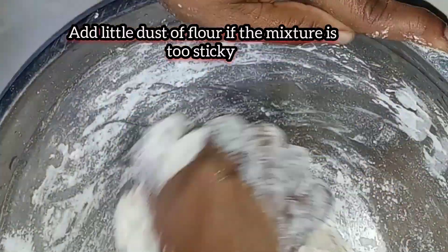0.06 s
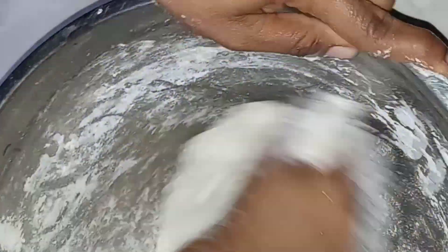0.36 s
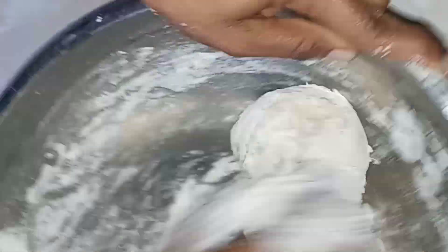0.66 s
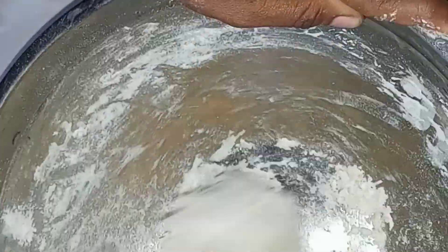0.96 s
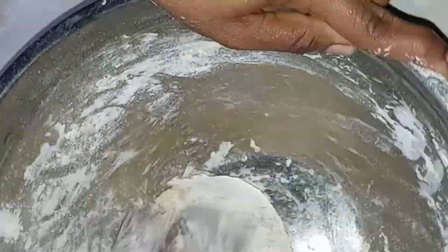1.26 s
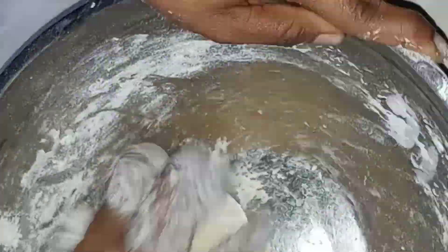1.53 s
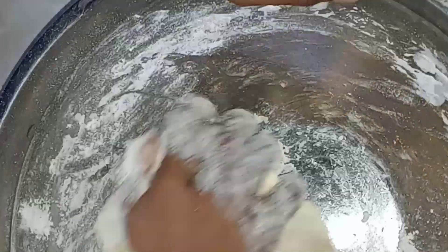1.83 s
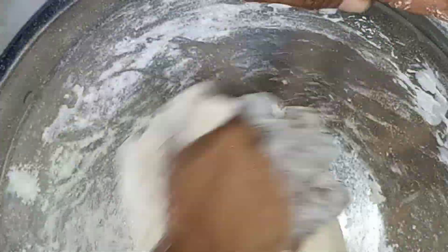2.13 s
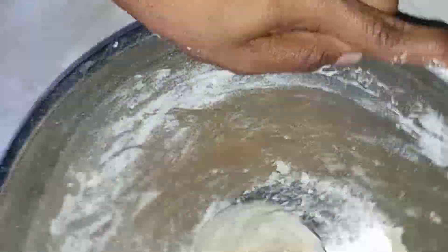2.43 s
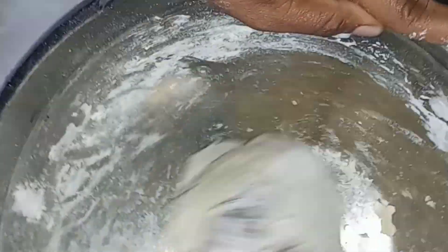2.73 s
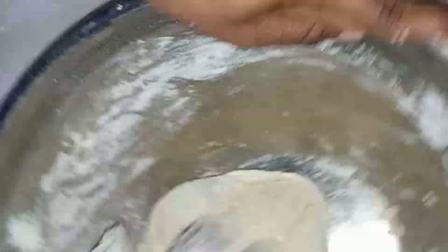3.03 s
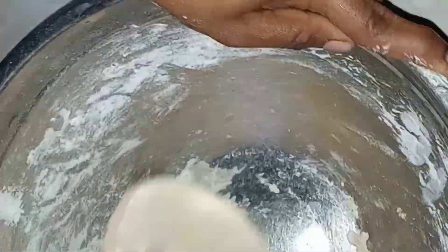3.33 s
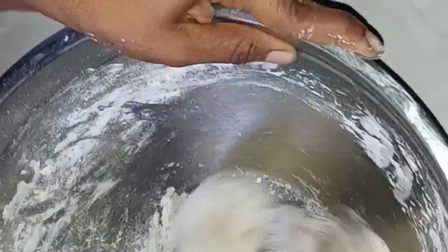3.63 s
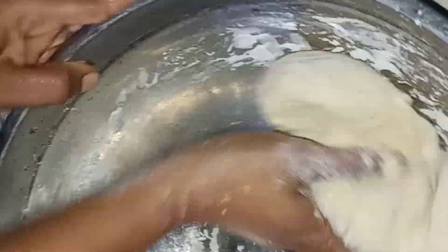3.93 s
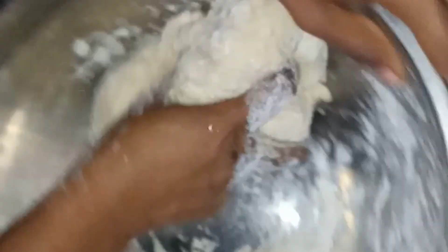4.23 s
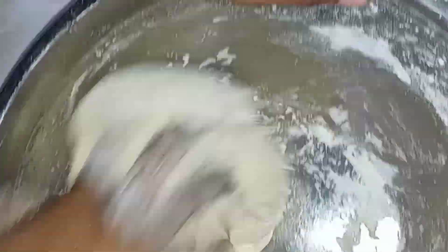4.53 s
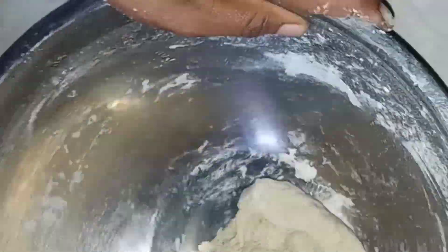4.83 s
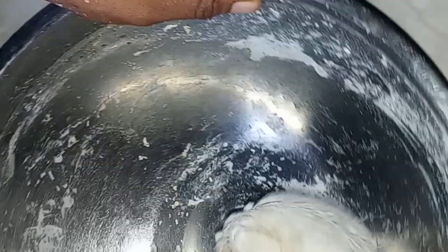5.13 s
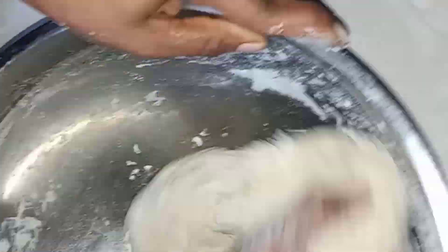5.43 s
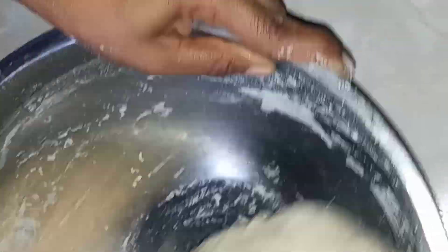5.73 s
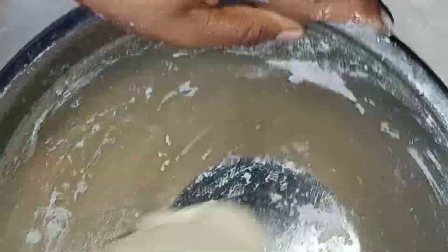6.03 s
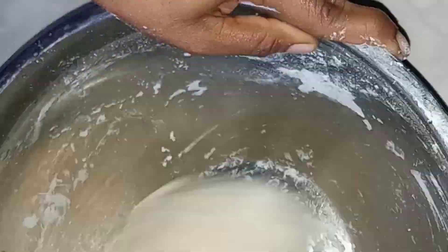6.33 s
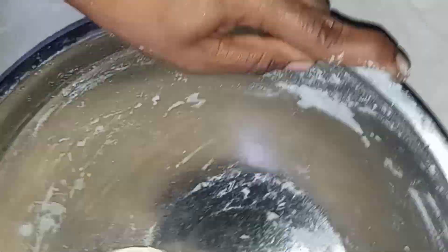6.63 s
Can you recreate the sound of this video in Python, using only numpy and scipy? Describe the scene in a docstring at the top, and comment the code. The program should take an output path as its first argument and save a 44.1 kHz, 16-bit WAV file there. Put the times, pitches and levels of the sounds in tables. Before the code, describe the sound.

Short, gritty swishes and soft, hollow thuds alternate as dough is pushed and turned by hand in a metal bowl. Tiny pops and a few faint skin squeaks slip in between. Around four seconds in comes a quick run of harder, moist smacks, followed by lighter slaps and more rubbing. The steel sounds damped, and the microphone is close, with a faint low kitchen background.

```python
"""A quiet kitchen, close up on a hand kneading soft dough in a floured steel bowl.
The dough lands in soft slaps, each with a hollow note of trapped air, and between them it is
wiped round the wall with a gritty hiss. Bubbles pop out of the folds and skin squeaks faintly.
The other hand grips the rim, so the steel hardly rings."""
import sys
import numpy as np
from scipy import signal
from scipy.fft import rfft, irfft
from scipy.io import wavfile
from scipy.ndimage import uniform_filter1d

SR = 44100
rng = np.random.default_rng(int(sys.argv[2]) if len(sys.argv) > 2 else 0)


def put_to_file(sound):
    """Save the sound as 16-bit audio at rate SR, in the file named by the first command-line argument."""
    columns = np.atleast_2d(sound).T  # one column per channel
    safe = np.clip(columns, -1, 1)
    whole_steps = np.round(safe * 32767)
    wavfile.write(sys.argv[1], SR, whole_steps.astype(np.int16))


N = 293706

# EQ of the kitchen's still air: freq_hz, gain_db
ROOM_EQ = [(15, -45), (25, -13.5), (82, 12), (166, 8.5), (242, -1), (516, 5), (754, -8), (863, -10),
           (1190, -9), (3430, -15), (5570, -32), (8360, -39.5), (13600, -33.5), (14800, -27.5),
           (16000, -20.5)]
# stereo width, side against mid: freq_hz, gain_db
SIDE_EQ = [(60, -15), (300, -12), (550, -8), (1300, -1.5), (2500, -0.5), (15000, 0.5)]
# balance, left against right: freq_hz, gain_db
BALANCE_EQ = [(100, -1.5), (600, 0.28), (1400, -0.095), (3000, -0.55), (10000, -2.3)]
# bowl modes damped by hand and dough: pitch_hz, width_hz, boost_db
DAMPED_MODES = [(166.7, 38.5, 10), (286.6, 31, 5.5), (361, 43, 14.5), (526.3, 52, 11), (868, 29, 6.5),
                (924, 63, 1), (1520, 58, 2), (1770.5, 29, 5), (1970, 12, 3), (2490, 38, 2),
                (4930, 120, 4.5), (5520, 144, 3)]
# modes of the free wall that ring on: pitch_hz, level_db, t60_s
RINGING_MODES = [(904, -29, 0.16), (1733, -23, 0.17), (2025, -25.5, 0.4), (4725, -21, 0.08),
                 (5500, -25, 0.044), (5900, -31, .08)]
# EQ of the rumble from the hand on the rim: freq_hz, gain_db
GRIP_EQ = [(50, 0.5), (110, -4.0), (250, -13.5), (550, -25.0), (900, -8.0)]
# EQs of a wipe's layers, rubbing hiss, flour fizz and low drag: freq_hz, gain_db
HISS_EQ = [(2800, -22.5), (3800, -5), (4700, -4), (5500, -1.5), (6000, -1), (6800, -2.5), (7600, -6.5),
           (9500, -40)]
FIZZ_EQ = [(5500, -22.5), (7500, 1.5), (9000, 2.5), (11000, 2), (13500, -2.5), (14500, 5), (15400, 9),
           (16200, -25)]
DRAG_EQ = [(25, -6), (70, 13.5), (130, -3), (280, -8.5), (520, 3), (900, 1), (1300, -1.5), (2200, -3),
           (3000, -0.5), (5000, -9.5), (7000, -57)]
# EQs of a slap's layers, thud, hollow air, smack and wet crack: freq_hz, gain_db
THUD_EQ = [(20, -50.5), (45, -16), (80, 1), (130, -0.5), (190, -1.5), (280, -8.5), (450, -32.5)]
HOLLOW_EQ = [(170, -22.5), (280, -4.5), (600, -0.5), (900, -18.0)]
SMACK_EQ = [(400, -28.5), (620, -4), (780, 2), (1080, -0.5), (1350, -14.5), (1900, -34)]
CRACK_EQ = [(700, -21), (1300, 7.5), (2000, 2), (3200, 0), (4200, -5), (5600, -1.5), (8000, -17.5),
            (13000, -27.5), (15500, -21.5)]

# skin squeaking on steel: start_s, level_db, pitch_hz, length_s
SQUEAKS = [(0.345, -66, 2756, 0.078), (0.444, -72.5, 3760, 0.069), (0.721, -69, 3660, 0.05),
           (2.425, -63, 2680, 0.062), (2.671, -68, 2920, 0.066), (3.267, -70.5, 4000, .05),
           (3.338, -64.5, 3840, 0.066), (3.516, -74.5, 3050, 0.065)]
# bubbles squeezed out of folds: start_s, level_db, pitch_hz
BUBBLES = [(0.819, -54.5, 490), (1.0534, -53, 630), (1.592, -57, 493), (1.705, -62, 525),
           (2.8318, -61.5, 547), (3.8184, -54, 503), (5.345, -64.5, 637), (5.4025, -63.5, 670),
           (5.7405, -54, 740), (6.2966, -61.5, 375)]
# pushes into dough already lying on the steel: start_s, level_db
PUSHES = [(0.471, -63.5), (0.7607, -50), (1.229, -54.5), (3.715, -64), (4.207, -46.5), (5.472, -56.5),
          (5.79, -56), (6.362, -61), (6.405, -52)]
# wipes along the wall: peak_s, rise_s, fall_s, level_db, pitch_hz
WALL_WIPES = [(0.105, 0.021, 0.011, -59.5, 5690), (0.273, .006, .08, -65, 5950),
              (0.373, .025, 0.039, -61, 5070), (0.483, 0.0073, .004, -57.5, 5530),
              (0.526, .007, .015, -62, 5900), (0.652, 0.026, .008, -49.5, 6100),
              (0.672, .007, 0.014, -50, 5300), (0.832, 0.052, .014, -48.5, 5510),
              (0.923, .05, 0.0052, -60, 5230), (1.087, .02, 0.0065, -63, 5780),
              (1.17, 0.024, 0.0093, -45.5, 5930), (1.291, 0.0035, 0.026, -49.5, 5450),
              (1.387, 0.012, 0.014, -50.5, 5900), (1.44, 0.046, 0.011, -64.5, 5400),
              (1.548, 0.0061, 0.015, -42.5, 5300), (1.619, 0.021, .02, -47.5, 5000),
              (1.683, 0.027, .023, -51.5, 4930), (1.776, 0.0027, 0.016, -52.5, 5200),
              (1.832, 0.013, 0.038, -51.5, 5830), (2.086, 0.02, 0.008, -61, 5450),
              (2.181, 0.016, 0.0056, -54.5, 5150), (2.247, 0.0045, .013, -55.5, 4840),
              (2.366, 0.01, 0.029, -43, 5100), (2.474, 0.038, .014, -54.5, 5000),
              (2.565, 0.002, 0.039, -52.5, 5100), (2.671, .016, 0.011, -53, 6500),
              (2.717, 0.026, 0.0033, -59, 5300), (2.853, 0.0066, .04, -68, 6100),
              (2.922, 0.0047, .0045, -54, 6120), (3.04, 0.065, 0.01, -63, 5200),
              (3.204, 0.026, .025, -60, 5260), (3.317, 0.016, 0.0088, -58, 4900),
              (3.488, 0.046, .012, -45.5, 6350), (3.637, 0.012, 0.038, -49.5, 5720),
              (3.737, 0.024, 0.0023, -48, 5280), (3.817, .018, .09, -48.5, 5300),
              (3.903, 0.021, .007, -44, 6100), (4.003, 0.018, .013, -36.5, 6100),
              (4.107, 0.014, 0.0092, -38, 6150), (4.219, 0.039, 0.058, -49.5, 5270),
              (4.451, .011, .024, -38, 6150), (4.478, .09, .015, -54, 5300), (4.643, .011, .06, -59, 5220),
              (4.772, 0.047, .019, -44.5, 5900), (4.943, 0.012, 0.0059, -52, 5450),
              (5.013, .016, 0.017, -47, 5340), (5.11, 0.015, .0055, -47, 6130),
              (5.171, 0.012, .012, -49, 5970), (5.24, .012, 0.042, -66, 5550),
              (5.36, 0.015, 0.015, -53.5, 5300), (5.43, .006, 0.032, -64.5, 5750),
              (5.544, 0.0073, 0.0093, -43, 5520), (5.674, .036, 0.063, -57.5, 5920),
              (5.865, 0.0077, 0.025, -43.5, 5480), (6.054, 0.0058, .03, -59.5, 5300),
              (6.118, .005, .038, -62, 5400), (6.256, 0.023, .018, -62.5, 4900),
              (6.308, 0.012, 0.0051, -56.5, 5750), (6.385, 0.0065, 0.0032, -51.5, 5430),
              (6.447, .01, 0.0068, -51.5, 6600), (6.498, 0.027, 0.039, -52, 5100)]
# dough landing on the steel: start_s, contact_s, level_db, pocket_hz, smack_offset_db, crack_offset_db
LANDINGS = [(0.5235, 0.00453, -50, 502, -25, -43), (0.6672, .014, -45, 287, -12.5, -21),
            (1.2781, .011, -58.5, 680, -0.5, -20), (1.5444, 0.00457, -42.5, 550, -37, -29),
            (2.0618, 0.011, -53.5, 540, -24, -27), (2.3074, 0.0034, -41.5, 573, -2, -1),
            (2.352, .019, -55.5, 520, -7, -20), (3.017, .0117, -52.5, 285, -12.5, -30),
            (3.2625, .0049, -34, 307, -10.5, -25.5), (3.9587, 0.0042, -33.5, 404, 1, -10.5),
            (4.0212, 0.011, -48, 720, -0.5, -10), (4.0864, .013, -45.5, 633, -10.5, -31.5),
            (4.1596, 0.0074, -36, 459, -5.5, -24), (4.2345, 0.0096, -55.5, 660, 0.5, -8),
            (4.3633, 0.013, -31, 451, -2.5, -2.5), (4.9965, 0.011, -59.5, 347, -16, -2),
            (5.175, .014, -49.5, 450, -18, -24), (5.5246, .0094, -41.5, 369, -19, -27),
            (5.8528, 0.012, -51, 374, -5, -28), (6.108, 0.013, -56, 483, -7, -20)]


def amp(db):
    """Decibels to gain."""
    return 10 ** (np.asarray(db) / 20)


def unit(x):
    """Scales to rms 1."""
    return x / np.sqrt(np.mean(x ** 2) + 1e-20)


def wobble(size, smooth_steps):
    """A smoothed random control signal of rms 1."""
    return unit(uniform_filter1d(rng.standard_normal(size), int(smooth_steps)))


def curve(points, hz):
    """An EQ table's gain in dB, read on a log-frequency axis."""
    freq_hz, gain_db = np.transpose(points)
    return np.interp(np.log(hz + 1), np.log(freq_hz + 1), gain_db)


def band(points, hz):
    """An EQ curve that rolls off 20 dB an octave beyond its table."""
    octaves_out = abs(np.log2((hz + 1) / np.clip(hz + 1, points[0][0], points[-1][0])))
    return np.maximum(curve(points, hz) - 20 * octaves_out, -90)


def eq(x, gain_db, size=4096):
    """Minimum-phase EQ that follows the function gain_db(hz)."""
    cepstrum = irfft(np.log(amp(gain_db(np.fft.rfftfreq(size, 1 / SR)))), size)
    cepstrum[1:size // 2] *= 2
    cepstrum[size // 2 + 1:] = 0
    taps = irfft(np.exp(rfft(cepstrum)), size)
    return signal.oaconvolve(x, taps[None], axes=1)[:, :x.shape[1]]


def swept_resonance(x, pitch_hz, width_hz):
    """A band-pass whose centre rides the curve pitch_hz."""
    carrier = np.exp(2j * np.pi * np.cumsum(pitch_hz) / SR)
    pole = np.exp(-np.pi * width_hz / SR)
    return (carrier * signal.lfilter([1 - pole], [1, -pole], x / carrier)).real


def add(mix, start_s, sound):
    """Drops a two-channel sound into the mix."""
    part = mix[:, max(round(start_s * SR), 0):][:, :sound.shape[1]]
    part += sound[:, :part.shape[1]]


def reflections(length_s, t60_s, predelay_s):
    """A reverb impulse of decaying noise, with unit energy in each channel."""
    t = np.arange(int(length_s * SR)) / SR
    tail = rng.standard_normal((2, len(t))) * amp(-60 * t / t60_s) * (t > predelay_s)
    return tail / np.linalg.norm(tail, axis=1, keepdims=True)


def room_tone(level_db=-72.5):
    """The bed: the still air of the kitchen."""
    return amp(level_db) * unit(eq(rng.standard_normal((2, N)), lambda hz: curve(ROOM_EQ, hz)))


def kitchen_reverb(x, wet_db=-25):
    """The walls return a weak, short tail, fed from the mid channel."""
    tail = reflections(length_s=0.5, t60_s=0.17, predelay_s=0.008)
    return x + amp(wet_db) * signal.fftconvolve(x[:1], tail, axes=1)[:, :N]


def bowl_db(hz):
    """The boost that the steel's damped resonances give."""
    return sum(db / (1 + (2 * (hz - pitch) / width) ** 2) for pitch, width, db in DAMPED_MODES)


def bowl_echoes(x, wet_db=-6, low_cut_hz=350):
    """Short waves bounce between the steel walls for a few hundredths of a second."""
    echoes = reflections(length_s=0.1, t60_s=0.052, predelay_s=0.00264)
    echoes = signal.sosfilt(signal.butter(2, low_cut_hz, "high", fs=SR, output="sos"), echoes)
    return x + amp(wet_db) * signal.fftconvolve(x, echoes, axes=1)[:, :N]


def bowl_ring(x):
    """Rubbing keeps the free wall of the bowl faintly ringing."""
    t = np.arange(SR // 2) / SR
    ring = np.zeros(len(t))
    for pitch_hz, level_db, t60_s in RINGING_MODES:
        unit_energy = np.sqrt(4 * np.log(1000) / t60_s / SR)
        ring += unit_energy * amp(level_db - 60 * t / t60_s) * np.cos(2 * np.pi * pitch_hz * t)
    return x + signal.fftconvolve(x, ring[None], axes=1)[:, :N]


def rim_grip(level_db=-78, uneven_db=5, shift_s=0.021):
    """The hand on the rim shifts its hold: a faint, lumpy rumble through the bowl."""
    lumps = unit(uniform_filter1d(wobble(N, shift_s * SR), size=900))
    rumble = eq(rng.standard_normal((2, N)), lambda hz: band(GRIP_EQ, hz) + bowl_db(hz) / 2)
    return amp(level_db) * unit(rumble * amp(uneven_db * np.minimum(lumps, 2)))


def skin_squeaks(half_width_hz=80):
    """Skin squeaks on the steel: short, fuzzy whistles that swell and fade."""
    out = np.zeros((2, N))
    for start_s, level_db, pitch_hz, length_s in SQUEAKS:
        size = int(length_s * SR)
        peak = lambda hz: -20 * np.log10(1 + ((hz - pitch_hz) / half_width_hz) ** 2)
        whistle = eq(rng.standard_normal((2, size)), peak)
        add(out, start_s, amp(level_db) * unit(whistle * np.hanning(size)))
    return out


def impact(tone, contact_s, level_db, rough, size=4096):
    """One push amid the patter of spreading dough, through the bowl; level_db is rms over 50 ms."""
    progress = np.arange(size) / SR / contact_s
    # the contact area grows, then stops growing as the dough comes to rest
    spreading = progress ** 2 * np.exp(-progress ** 2)
    drive = rough * unit(spreading * rng.standard_normal((2, size))) / np.sqrt(size)
    drive[0, min(round(0.9 * contact_s * SR), size - 1)] += 1  # the push, dead centre
    hit = eq(drive, lambda hz: tone(hz) + bowl_db(hz))
    return amp(level_db) * hit * np.sqrt(SR / 20 / np.sum(hit ** 2, axis=1, keepdims=True))


def air_pocket(pitch_hz, hump_octaves=1.0, note_db=5, note_octaves=0.068):
    """The tone of trapped air, as an EQ function: a clear note on a broad hump."""
    def tone(hz):
        octaves = np.log2((hz + 1) / pitch_hz)
        hump = band(HOLLOW_EQ, hz) - 20 * np.log10(1 + (octaves / hump_octaves) ** 2)
        note = note_db / (1 + (octaves / note_octaves) ** 2)
        return hump + note - bowl_db(hz) / 2  # the dough damps the steel
    return tone


def bubble_pops(contact_s=0.0052, width_octaves=0.41):
    """A bursting bubble sounds its note alone, without a thud."""
    out = np.zeros((2, N))
    for start_s, level_db, pitch_hz in BUBBLES:
        detune = lambda hz: np.log2((hz + 1) / pitch_hz) / width_octaves
        note = lambda hz: -30 * np.log10(1 + detune(hz) ** 2) - bowl_db(hz) / 2
        add(out, start_s, impact(note, contact_s, level_db, rough=1.54))
    return out


def palm_pushes(contact_s=0.0135, air_db=-10.5):
    """A slow push gives a dull thud with hardly any trapped air."""
    out = np.zeros((2, N))
    hollow = air_pocket(pitch_hz=380, hump_octaves=1.2, note_db=10.5)
    for start_s, level_db in PUSHES:
        thud = impact(lambda hz: band(THUD_EQ, hz), 0.79 * contact_s, level_db, rough=1)
        air = impact(hollow, contact_s, level_db + air_db, rough=3.3)
        add(out, start_s, thud + air)
    return out


def shifting_gap(x, depth_db, patch_bins=4, patch_frames=12):
    """The changing gap between dough and steel favours other pitches from moment to moment."""
    spectrum = signal.stft(x, nperseg=512, noverlap=384)[2]
    patches = uniform_filter1d(rng.standard_normal(spectrum.shape[1:]), patch_bins, axis=0)
    patches = unit(uniform_filter1d(patches, patch_frames, axis=1))
    return signal.istft(spectrum * amp(depth_db * patches), nperseg=512, noverlap=384)[1][:, :N]


def flour_grit(eq_table, grains_per_s, grain_db, shift_db):
    """Flour grains catch and slip on the steel: many tiny clicks over a smooth rub."""
    strength = amp(grain_db * np.minimum(rng.exponential(1, N), 4))
    catches = rng.random(N) < grains_per_s / SR
    clicks = unit(strength * catches * rng.standard_normal((2, N)))
    rub = shifting_gap(clicks + rng.standard_normal((2, N)), shift_db)
    return unit(eq(rub, lambda hz: band(eq_table, hz) + bowl_db(hz)))


def dough_wipes(usual_db=-50, usual_hz=5558, brush_db=-79, brush_hz=5600, judder_db=2.06):
    """Dough and palm slide over the floured wall; each wipe swells, fades and has its own pitch."""
    peak_s, rise_s, fall_s, wipe_db, wipe_hz = np.transpose(WALL_WIPES)[:, :, None]
    step_s = 0.002
    t = np.arange(0, N / SR, step_s)
    from_peak = (t - peak_s) / np.where(t < peak_s, rise_s, fall_s)
    swell = (1 + from_peak ** 2 / 3) ** -3.94  # power envelope, one row a wipe
    # the dough keeps brushing the wall lightly: one more wipe that never ends
    brushing = amp(2 * wobble(len(t), 0.15 / step_s)) ** 2
    swell = np.vstack([swell, brushing])
    wipe_db = np.vstack([wipe_db, [brush_db]])
    wipe_hz = np.vstack([wipe_hz, [brush_hz]])
    # a fast, light wipe hisses higher and raises flour fizz; a slow one drags on the wall
    harder_db, higher_khz = wipe_db - usual_db, (wipe_hz - usual_hz) / 1000
    fizz_db = usual_db + 1.0041 * harder_db + 8 * higher_khz
    drag_db = usual_db + 0.77 * harder_db - 5.5 * higher_khz
    judder = amp(judder_db * wobble(N, 0.018 * SR))
    to_audio_rate = lambda control: np.interp(np.arange(N) / SR, t, control)
    fader = lambda db: judder * to_audio_rate(np.sqrt((swell * amp(db) ** 2).sum(0)))
    # the strongest wipe leads the pitch of the hiss
    power = swell * amp(wipe_db) ** 2
    pitch_hz = to_audio_rate((power * wipe_hz).sum(0) / power.sum(0))
    hiss = flour_grit(HISS_EQ, grains_per_s=5000, grain_db=3.5, shift_db=3.5)
    hiss = unit(swept_resonance(hiss, pitch_hz, width_hz=1460))
    fizz = flour_grit(FIZZ_EQ, grains_per_s=7800, grain_db=4, shift_db=2.5)
    drag = flour_grit(DRAG_EQ, grains_per_s=3500, grain_db=2, shift_db=5)
    return fader(wipe_db - 3) * hiss + fader(fizz_db - 16) * fizz + fader(drag_db - 7) * drag


def dough_slaps(usual_contact_s=0.01, usual_db=-51.5, hard_smack_db=-33):
    """The mass of the dough thuds, an air pocket sounds its note, the moist skin smacks and cracks."""
    out = np.zeros((2, N))
    for start_s, contact_s, level_db, pocket_hz, smack_offset_db, crack_offset_db in LANDINGS:
        # a quick, hard landing traps more air: the hollow note gains on the thud
        air_db = -0.5 + 5.5 * np.log2(usual_contact_s / contact_s) + 0.16 * (level_db - usual_db)
        smack_db, crack_db = level_db + smack_offset_db, level_db + crack_offset_db
        transpose = 2 ** (0.0051 * (hard_smack_db - smack_db))  # a fainter smack sits a little higher
        thud = impact(lambda hz: band(THUD_EQ, hz), 1.21 * contact_s, level_db - air_db / 2, rough=1)
        hollow = impact(air_pocket(pocket_hz), contact_s, level_db + air_db / 2, rough=1.75)
        smack = impact(lambda hz: band(SMACK_EQ, hz / transpose), contact_s, smack_db - 2, rough=4.3)
        crack = impact(lambda hz: band(CRACK_EQ, hz), contact_s, crack_db - 1, rough=24)
        add(out, start_s, thud + hollow + smack + crack)
    return out


def scene():
    """Mixes in mid and side, then decodes to left and right: bass near mono, treble wide."""
    hits = bowl_echoes(dough_slaps() + palm_pushes() + bubble_pops())
    kneading = kitchen_reverb(hits + bowl_ring(dough_wipes()))
    mix = kneading + rim_grip() + skin_squeaks() + room_tone()
    mid = mix[0]
    side = eq(mix[1:], lambda hz: curve(SIDE_EQ, hz))[0]
    return np.array([mid + side, mid - side])


def record(dry):
    """The microphones lean slightly right in the bass and treble; a steep high cut trims the top."""
    balance_db = curve(BALANCE_EQ, np.fft.rfftfreq(N, 1 / SR))
    panned = irfft(rfft(dry) * amp([balance_db / 2, -balance_db / 2]), N)
    high_cut = signal.firwin(511, cutoff=15800, window=("kaiser", 9), fs=SR)
    return signal.oaconvolve(panned, high_cut[None], "same")


dry = scene()
out = record(dry)
put_to_file(out)
```